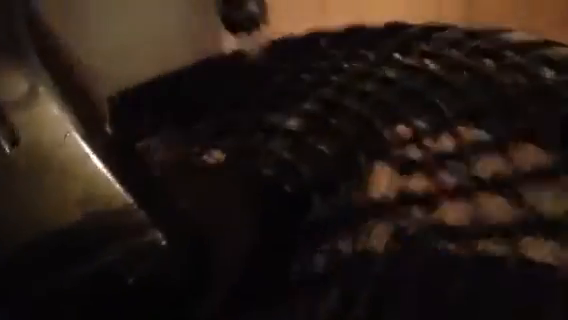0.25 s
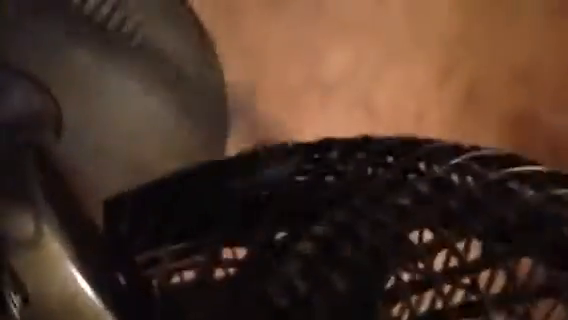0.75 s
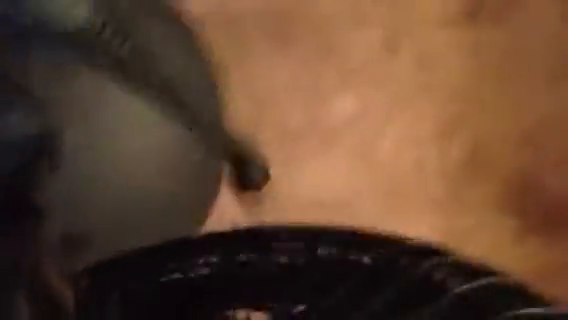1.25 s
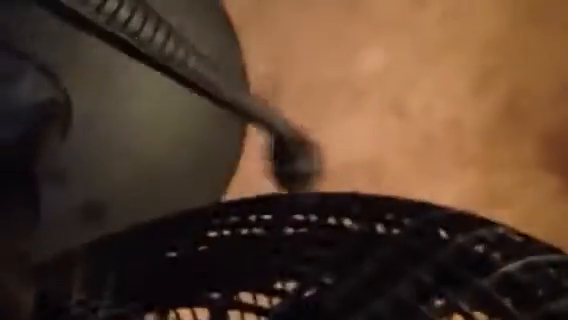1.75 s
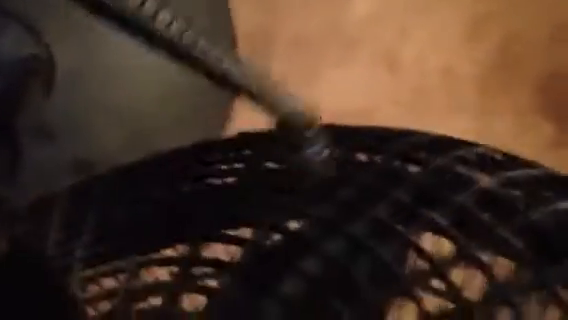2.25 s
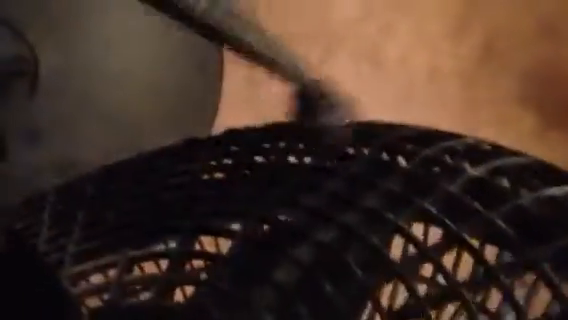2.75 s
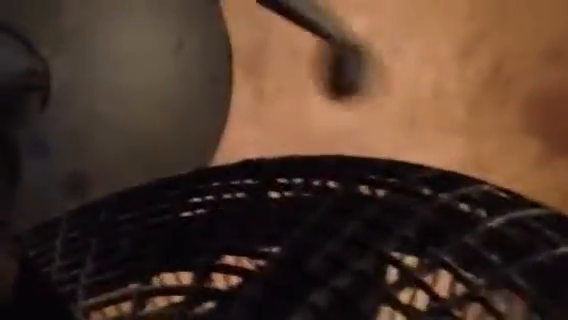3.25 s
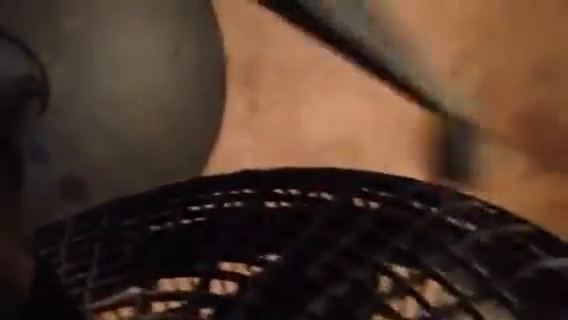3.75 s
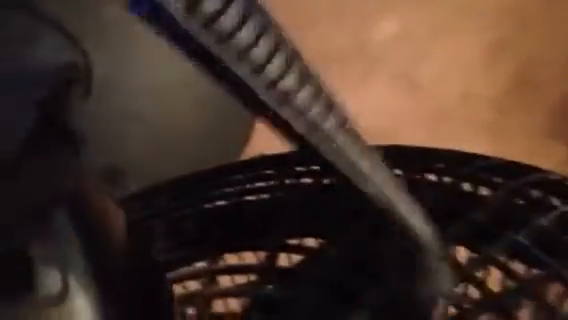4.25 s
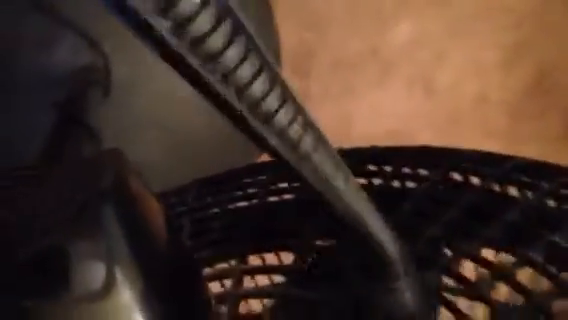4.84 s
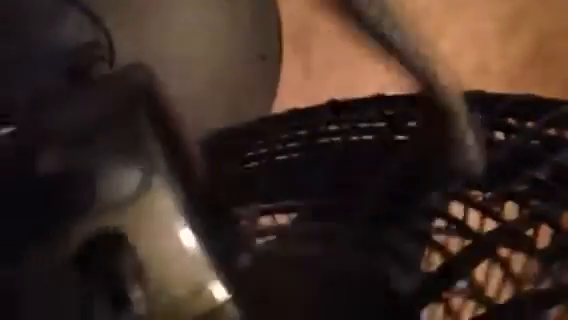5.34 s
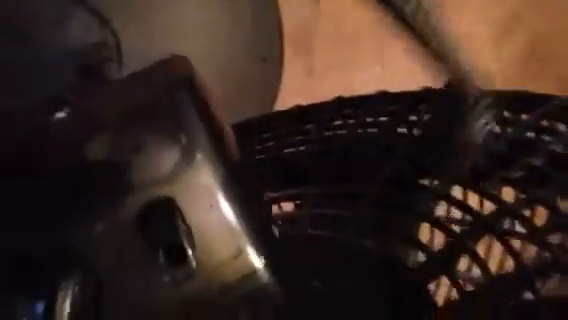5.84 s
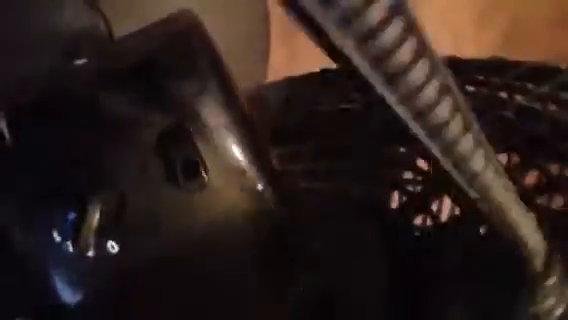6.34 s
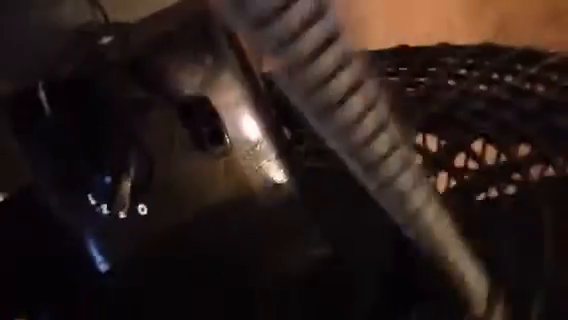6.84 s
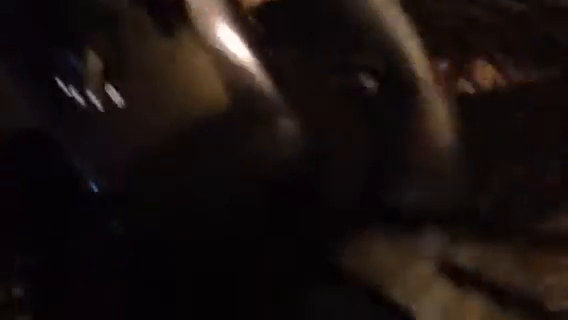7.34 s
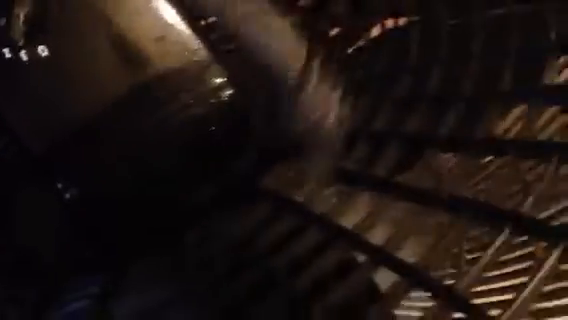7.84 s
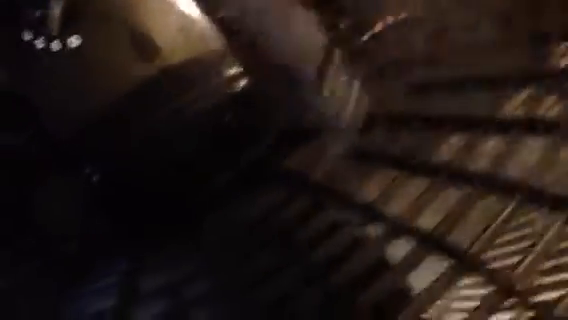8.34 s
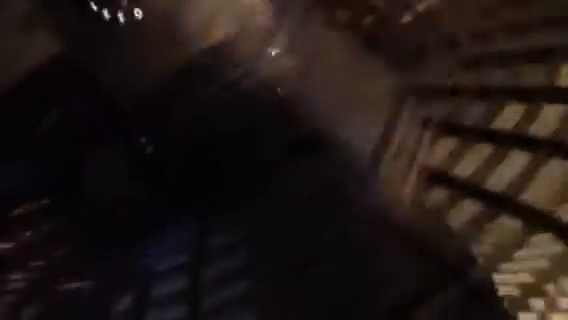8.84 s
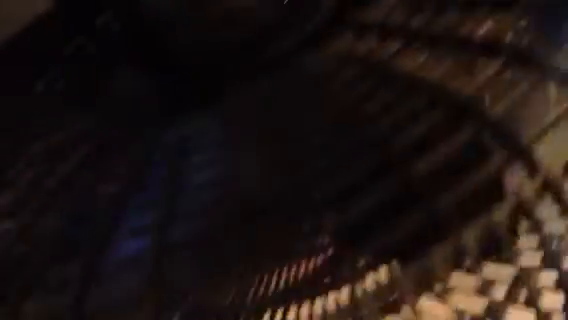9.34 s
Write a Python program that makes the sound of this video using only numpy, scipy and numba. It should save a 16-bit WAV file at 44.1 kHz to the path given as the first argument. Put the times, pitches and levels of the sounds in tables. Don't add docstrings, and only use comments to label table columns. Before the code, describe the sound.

A pressurised steam nozzle hisses from the very start to the end near 9.6 s, heard very close on a slightly grainy one-microphone phone indoors. The hiss is bright, wet and finely sputtering, with a hollow, wandering ring around 5 kHz. From 0 to 4 s it sweeps a fan's wire guard: the roar swells on wires and thins at openings, short whistles appear around 1.3-1.6, 2.2 and 3.1 s, and soft low gusts buffet the microphone. From about 4 s the jet strikes the blades, adding abrupt broad howls around 2-4 kHz, clustered at 4.5-5.3 s and strongest at 6.0-6.3 s. Small drops snap at 4.3, 6.4 (loudest) and 7.7 s. From 7.2 to 8.9 s sliding whistles and rougher, fuller bursts alternate, then the wavering hiss simply continues to the cut.

```python
import sys
import numpy as np
from scipy import signal
from scipy.fft import rfft, irfft, dct, next_fast_len
from scipy.io import wavfile
from scipy.ndimage import uniform_filter1d
from numba import njit

SR = 44100
rng = np.random.default_rng(int(sys.argv[2]) if len(sys.argv) > 2 else 0)


def convert_level_to_amplitude(level_db):
    exponent = np.asarray(level_db, float) / 20
    return 10 ** exponent


def dump(signal):
    limited = np.clip(np.atleast_2d(signal).T, -1, 1)
    pcm = np.round(limited * 32767).astype(np.int16)
    wavfile.write(sys.argv[1], SR, pcm)


N = 422037
TIME = np.arange(N) / SR
BODY_HZ, CHEST_HZ, ROAR_HZ, RING_HZ, FIZZ_HZ, AIR_HZ = 370, 810, 1800, 4250, 7000, 10700

# freq_hz, density_db (per Hz)
HISS = [(250, -27), (400, -11.5), (630, -9), (1000, -7.5), (1400, -5.5), (1750, -3), (2500, -2.5),
        (3700, -2.5), (5300, -0.5), (7800, -4), (12000, -5.5), (13500, -6.5), (15000, -6.5)]
# time_s, flow_db, aim_db (at phone), shade_db (steam cloud on the top), contact_db (guard)
SWEEP = [(0.0, -25.5, -4, 0.5, -1), (0.56, -22.5, -4.5, 2.5, -4), (1.13, -28.5, 1, 1.5, -0.7),
         (1.69, -20, -8, 1.5, -9.5), (2.25, -25, 3.4, 4.5, -2), (2.81, -25, -2, 3.5, -3.5),
         (3.38, -25.5, -1.3, 7.5, -3), (3.94, -24.2, -2, 7, -5), (4.5, -21.5, -2, 7.5, -5),
         (5.07, -23, -2.5, 7, -2), (5.63, -27, -0.3, 3, 0.5), (6.19, -23.5, -5, 4, 2),
         (6.76, -26, -2, 3, -1.55), (7.32, -23, -3.5, 5, -0.64), (7.88, -23, -5, 2.6, -2.5),
         (8.44, -23, -4.5, 4, -4.5), (9.01, -23.9, -2, 3.8, -3), (9.57, -24, -7.5, 3.6, -3.5)]


def unit(x):
    return x / np.sqrt(np.mean(x ** 2))


def curves(table):
    s, *columns = np.transpose(table)
    return [np.interp(TIME, s, c) for c in columns]


def walk(rate_hz):
    hold = int(SR / rate_hz)
    held = np.repeat(rng.standard_normal(N // hold + 1), hold)
    return unit(uniform_filter1d(uniform_filter1d(held, hold), hold)[:N])


def flutter(rate_hz):
    shake = walk(rate_hz)
    return unit(shake - uniform_filter1d(shake, int(4 * SR / rate_hz)))


def gate(t, length_s, edge_s):
    return np.clip(np.minimum(t, length_s - t) / edge_s, 0, 1)


def swings(table, eddy=None):
    rise_s, fall_s, size_spread = .025, .03, .6
    total_db = 0.68 * flutter(65)
    for s, hold_s, db, *size in table:
        a, b = int(max(s, 0) * SR), int((s + rise_s + max(hold_s, 0) + fall_s) * SR)
        t = TIME[a:b] - s
        reach = np.exp(-((size[0] - eddy) / size_spread) ** 2) if size else 1
        rise, fall = t / rise_s, 1 - (t - rise_s - hold_s) / fall_s
        total_db[a:b] += db * reach * np.clip(np.minimum(rise, fall), 0, 1)
    return total_db


def band(x, colour, lo_hz, hi_hz, skirt_oct):
    size = next_fast_len(N)
    octave = np.log2(np.arange(size // 2 + 1) * SR / size + 1)
    hz, db = np.transpose(colour)
    rise = np.clip((octave - np.log2(lo_hz)) / skirt_oct + .5, 0, 1)
    fall = np.clip((octave - np.log2(hi_hz)) / skirt_oct + .5, 0, 1)
    tilt = convert_level_to_amplitude(np.interp(octave, np.log2(hz), db))
    shape = np.sin(np.pi / 2 * rise) * np.cos(np.pi / 2 * fall) * tilt
    return irfft(rfft(x, size) * shape, size)[:N]


@njit
def svf(x, hz, share):
    y, b, l = np.empty(len(x)), 0., 0.
    for i in range(len(x)):
        g = np.tan(np.pi * hz[i] / SR)
        v = (b + g * (x[i] - l)) / (1 + g * (g + share))
        b, l, y[i] = 2 * v - b, l + 2 * g * v, share * v
    return y


def turbulence(spit, lo_hz, hi_hz, count, patchy_db, rate_hz, colour=HISS):
    edges_hz = np.geomspace(lo_hz, hi_hz, count + 1)
    total = np.zeros(N)
    for a_hz, b_hz in zip(edges_hz, edges_hz[1:]):
        eddies = band(spit * rng.standard_normal(N), colour, a_hz, b_hz, .4)
        total += convert_level_to_amplitude(patchy_db * walk(rate_hz)) * eddies
    return unit(total)


def sputter(surge_db, drop_db, drops_per_s):
    drops = (rng.random(N) < drops_per_s / SR) * convert_level_to_amplitude(drop_db * rng.exponential(size=N))
    flash = signal.lfilter([1], [1, -np.exp(-1 / (0.001 * SR))], drops)
    return convert_level_to_amplitude(surge_db * flutter(60)) * (1 + 0.36 * flash)


def buffet():
    # freq_hz, density_db (per Hz)
    rumble = [(12, -49), (20, -28), (48, -12.5), (150, -7), (173, -5.5), (307, -7.5), (400, -7), (520, -29),
              (880, -120)]
    # start_s, hold_s, gain_db
    arrivals = [(.05, .08, 3), (.3, .17, 4.5), (.65, .55, -1.5), (1.29, .28, 5.5), (1.7, .12, 1.5),
                (2.0, 1.08, -1), (3.15, .22, 6), (3.43, .25, 6), (3.72, .1, 2.5), (3.94, .08, 4.5),
                (4.12, .13, 3.5), (4.49, .27, 4), (4.88, .17, 4.5), (5.28, .45, 4), (5.5, .12, 2),
                (5.8, .1, 3), (6.43, .14, 4.5), (6.79, .08, 3.5), (7.0, .06, 2.5), (7.19, .3, 5),
                (8.4, .08, 6), (8.63, .25, 1.5), (9.05, .25, 4)]
    calm_db = -56.3
    gusts = turbulence(convert_level_to_amplitude(.6 * walk(9)), 18, BODY_HZ, count=4, patchy_db=.9, rate_hz=12, colour=rumble)
    return convert_level_to_amplitude(calm_db + swings(arrivals) + 1.04) * gusts


def ripple(x, ripple_db):
    size = 2048
    lines = signal.stft(x, SR, nperseg=size)[2]
    comb = uniform_filter1d(rng.standard_normal(lines.shape), size=3, axis=0)
    comb = uniform_filter1d(comb, size=2, axis=1)
    lines = lines * convert_level_to_amplitude(ripple_db * comb / comb.std() - 0.95)
    return signal.istft(lines, SR, nperseg=size)[1][:N]


def shift_bands(x):
    # start_s, length_s, change_db, centre_hz
    band_moves = [(.05, .22, 3, 4800), (.32, .22, 3, 4200), (1.16, .17, 3, 8500), (1.41, .08, 3, 6500),
                  (1.43, .09, 3, 4400), (1.55, .09, 4, 4500), (1.84, .14, 3, 9400), (2.71, .08, 3, 6800),
                  (2.99, .07, 3, 5750), (3.29, .11, 4, 9400), (3.5, .07, 4, 4400), (3.99, .33, 3.5, 6300),
                  (4.55, .09, 3, 8600), (4.68, .06, 4, 6300), (5.07, .08, 3, 6700), (5.15, .12, 3, 7700),
                  (5.42, .1, 4, 5200), (5.99, .13, 3.5, 6800), (6.11, .21, 3, 7900), (6.66, .12, 3.5, 5450),
                  (7.23, .14, 4, 7800), (7.41, .1, 3, 4300), (8.12, .2, 3, 1900), (8.29, .13, 3, 7500),
                  (8.89, .18, 3, 6600), (9.0, .22, 3.5, 4100), (9.1, .27, 3, 7900), (9.24, .14, 3, 4350),
                  (1.24, .07, -4, 5100), (1.43, .06, -3, 5300), (1.82, .12, -3.5, 5300), (2.63, .11, -4, 8000),
               (2.8, .15, -4, 8500), (2.84, .11, -4, 5900), (3.45, .2, -4, 7500), (3.56, .07, -4, 1300),
               (3.62, .08, -4, 5900), (4.74, .07, -4, 5300), (4.84, .15, -4, 5100), (4.92, .29, -3, 9400),
               (5.07, .05, -2.5, 3150), (5.32, .38, -3.5, 8000), (5.75, .3, -3, 8500),
               (6.07, .06, -4, 4900), (6.18, .14, -3, 3900), (6.31, .12, -3, 2400), (6.47, .12, -3, 2400),
               (6.38, .18, -3, 5600), (7.13, .1, -4, 8400), (7.34, .24, -4, 6300), (7.68, .3, -3, 3600),
               (8.08, .17, -4, 5800), (8.1, .2, -3, 3500), (8.71, .12, -3, 6000), (9.35, .21, -4, 6100),
               (8.48, .1, -3, 5300), (3.82, .1, -3, 2200)]
    width, edge_s = .3, .03
    out = x.copy()
    for s, length_s, db, hz in band_moves:
        a, b = int(s * SR), int((s + length_s) * SR)
        t = TIME[a:b] - s
        change = convert_level_to_amplitude(db * gate(t, length_s, edge_s)) - 1
        out[a:b] += change * svf(out[a:b], np.full(len(t), 1. * hz), width)
    return out


def howls(table, rush, edge_s, width):
    out = np.zeros(N)
    for s, length_s, db, *hz in table:
        a, b = int(s * SR), int((s + length_s) * SR)
        centre_hz = np.linspace(hz[0], hz[-1], b - a)
        tone = unit(svf(svf(rush[a:b], centre_hz, width), centre_hz, width))
        out[a:b] += convert_level_to_amplitude(db) * gate(TIME[a:b] - s, length_s, edge_s) * tone
    return out


def blades(spit):
    # start_s, length_s, level_db, centre_hz
    blade_hits = [(4.545, 0.033, -25, 1570), (4.707, 0.072, -27, 3840), (4.927, 0.073, -24.5, 1950),
                  (4.91, .09, -23.5, 3620), (5.08, 0.039, -23, 3000), (5.166, 0.12, -23, 3330),
                  (5.993, 0.035, -26.5, 1260), (6.03, .052, -18.5, 2600), (6.09, .05, -22, 2650),
                  (6.144, 0.15, -21, 2750), (6.15, .14, -27, 1500), (6.02, .055, -26, 3700),
                  (7.568, .07, -25.5, 1800), (7.672, 0.045, -26, 2840), (8.857, .04, -32.5, 1000),
                  (5.625, .05, -25.5, 3000), (5.7, .045, -28, 2800), (6.15, .15, -26, 3700),
                  (4.57, .06, -28, 2600), (5.25, .058, -26, 3500), (4.72, .085, -28, 2700),
                  (7.59, .04, -33, 900), (8.385, .05, -33.5, 750), (9.15, 0.044, -35.5, 700),
                  (4.72, 0.095, -30, 1800), (3.99, 0.037, -45.5, 200), (5.81, .05, -47, 205),
                  (6.79, .05, -50, 180)]
    # start_s, length_s, level_db, whistle_hz
    whistles = [(.35, .08, -27, 5370), (1.31, .06, -25, 4930), (1.45, .08, -27, 6300),
                (1.62, .09, -24.5, 5300), (2.23, .07, -22, 5350), (3.14, .06, -24, 4800),
                (4.08, .1, -23, 4900), (4.52, .07, -27.5, 5440), (5.03, 0.082, -29, 5750),
                (5.2, .1, -25.5, 6050), (5.38, 0.088, -30.5, 5600), (6.18, .25, -29.5, 5240),
                (6.42, .05, -26, 6500), (7.19, 0.099, -25.5, 5050), (7.99, 0.1, -25.5, 5650),
                (8.24, .11, -28, 4250), (8.7, .25, -28.5, 4930)]
    # start_s, length_s, level_db, from_hz, to_hz
    slides = [(1.31, .05, -27, 5900, 5700), (1.62, .09, -27.5, 5900, 5200), (3.53, .07, -28, 4950, 5050),
              (3.67, .1, -24.5, 5000, 6000), (5.17, .07, -25, 3400, 3700), (7.745, .05, -26, 4900, 4500),
              (7.8, .14, -25, 4700, 5300), (8.09, .13, -24, 5000, 4550), (8.37, .11, -26, 4100, 4500),
              (8.49, .04, -27, 6900, 6900), (8.55, .04, -26, 7000, 6500), (3.14, .1, -29, 4900, 5000),
              (1.93, .07, -29, 5500, 5300), (4.6, .13, -27, 5600, 5600), (5.52, .1, -31, 4600, 4800),
              (7.52, .15, -28, 5600, 5200), (8.43, .05, -29, 5400, 5400)]
    # start_s, peak_db
    ticks = [
        (4.275, -9.5),
        (6.394, -7),
        (7.656, -11),
    ]
    rush = spit * convert_level_to_amplitude(0.88 * walk(40)) * rng.standard_normal((2, N))
    out = howls(blade_hits, rush[0], edge_s=0.007, width=.48)
    out += howls(whistles, rush[1], edge_s=.02, width=.18)
    out += howls(slides, rush[1][::-1].copy(), edge_s=.02, width=.1)
    t = TIME[:100]
    for s, db in ticks:
        out[int(s * SR):][:len(t)] += convert_level_to_amplitude(db) * np.exp(-t / .0003) * np.sin(2 * np.pi * 5000 * t)
    return out


def wires(spit):
    # start_s, hold_s, gain_db, eddy_size (0-1)
    strikes = [(0.64, 0.047, 3, 0.8), (1.22, 0.058, 5, 0.6), (1.44, 0.02, 3, 0.3), (1.95, 0.02, 9, 0.7),
               (2.6, 0.07, 2.5, 0.8), (3.5, 0.07, 3.5, 0.7), (4.0, 0.02, 5.5, 0.9), (4.08, 0.073, 2.5, 0.0),
               (4.53, 0.02, 7.5, 0.5), (4.59, 0.0034, 4, 0.98), (4.7, 0.048, 5.7, 0.4),
               (4.91, 0.027, 6.5, 0.4), (4.96, 0.0046, 2.5, 0.1), (5.07, 0.0085, 7.5, 0.2),
               (5.11, 0.04, 3.4, 0.2), (5.15, 0.12, 7, 0.25), (5.59, 0.0, 5.5, 0.8), (6.02, 0.016, 6, 0.0),
               (6.14, 0.07, 4, 0.4), (6.48, 0.1, 4.5, 0.94), (6.78, 0.008, 5.5, 1.0), (6.99, 0.02, 4, 1.0),
               (7.56, 0.046, 5, 1), (7.75, 0.054, 4, 1), (7.9, 0.033, 6.5, 1.0), (8.37, 0.02, 8, 0.86),
               (8.64, 0.015, 5, 0.7), (8.84, 0.011, 7.5, 0.83), (9.12, 0.17, 3, 0.93), (.04, .01, 5, .8),
               (2.63, .01, 3, .8), (5.49, .015, 4, .6), (8.12, .02, 3.5, .7), (8.19, .02, 4, .7),
               (6.24, .03, 2, .6)]
    # start_s, hold_s, loss_db, eddy_size (0-1)
    openings = [(0.0, 0.0, -11.5, 0.8), (0.11, 0.07, -7.7, 0.98), (0.303, 0.07, -5, 1.0),
                (0.945, 0.06, -5, 0.9), (1.818, 0.13, -5.5, 1.0), (2.04, 0.02, -6, 0.7),
                (5.298, 0.13, -4.2, 0.2), (5.66, 0.02, -5, 1.0), (5.733, 0.1, -4, 0.3),
                (5.87, 0.06, -4, 0.7), (6.08, 0.044, -5.5, 1.0), (6.29, 0.15, -7, 0.3),
                (6.463, 0.22, -6, 0.5), (6.94, 0.043, -1.5, 0.8), (7.063, 0.07, -6, 0.4),
                (7.965, 0.07, -5, 0.5), (8.26, 0.06, -1.5, 0.5), (8.51, 0.02, -4, 0.4),
                (9.342, 0.073, -3, 0.6), (1.15, .04, -3.5, .8), (3.9, .06, -4, .6), (5.23, .04, -2, .8)]
    # time_s, wake_hz
    wake_path = [(4.5, 2850), (4.56, 1930), (4.63, 2850), (5.25, 3350), (5.95, 2700), (6.3, 2540),
                 (7.2, 3230), (7.6, 2340), (8.0, 2820)]
    flow_db, _, _, contact_db = curves(SWEEP)
    moves = strikes + openings
    push_db = flow_db + contact_db
    roar_db = push_db + swings(moves, eddy=0)
    chest_db = push_db - 8.5 + swings(moves, eddy=.5)
    body_db = push_db - 16 + swings(moves, eddy=1)

    broad = turbulence(spit, ROAR_HZ, RING_HZ, count=4, patchy_db=0.66, rate_hz=25)
    wake_hz = curves(wake_path)[0] * (1 + .09 * walk(12))
    wake = unit(svf(broad, wake_hz, .3))
    share = np.clip(.15 + .04 * (roar_db + 27.0), 0, .8)
    roar = unit(np.sqrt(1 - share) * unit(broad) + 0.55 * share * wake)
    chest = turbulence(spit, CHEST_HZ, ROAR_HZ, count=3, patchy_db=1.0, rate_hz=22)
    body = turbulence(spit, BODY_HZ, CHEST_HZ, count=2, patchy_db=1.0, rate_hz=19)
    return convert_level_to_amplitude(roar_db + 0.81) * roar + convert_level_to_amplitude(chest_db + 0.98) * chest + convert_level_to_amplitude(body_db + 1.07) * body


def jet(spit):
    # time_s, centre_hz
    tip_path = [(0.0, 4930), (.37, 5250), (.96, 5160), (1.44, 5400), (2.29, 5430), (2.93, 5130),
                (3.54, 5080), (3.75, 5470), (4.16, 5180), (4.3, 5600), (5.0, 4960), (5.44, 5380),
                (6.48, 5530), (7.01, 5420), (7.8, 5010), (8.43, 4680), (8.5, 5300), (9.57, 5380)]
    # start_s, hold_s, change_db
    flares = [(0.33, 0.064, 4.7), (0.65, 0.027, 2.5), (1.13, 0.12, 2.4), (1.3, 0.17, 3),
              (1.36, 0.0095, -2.5), (1.7, 0.02, -5.5), (1.81, 0.1, -1.5), (2.0, 0.04, -1.5),
              (2.22, 0.054, 5.5), (2.52, 0.063, -1.5), (3.13, 0.059, 5), (3.69, 0.053, 1), (4.06, 0.076, 4),
              (4.27, 0.006, -9.5), (4.41, 0.0027, -13), (4.57, 0.07, -2), (4.73, 0.16, -2),
              (4.93, 0.045, -4), (5.3, 0.17, -3), (5.93, 0.0075, -4.5), (6.24, 0.13, -2.5),
              (6.83, 0.043, 3.8), (7.09, 0.04, -5.5), (7.18, 0.1, 4), (7.44, 0.068, -3),
              (7.68, 0.013, -3.5), (8.18, 0.029, -2.5), (8.32, 0.034, -4), (8.59, 0.07, -1.5),
              (8.83, 0.039, -1.5)]
    # start_s, hold_s, change_db
    flicks = [(0.13, 0.054, -3.7), (0.94, 0.051, -5.5), (1.14, 0.04, -4.5), (1.32, 0.054, -3),
              (1.42, 0.044, 4), (1.52, 0.041, -5), (1.7, 0.031, -4), (1.86, 0.04, -3.6), (2.2, 0.014, -4),
              (2.36, 0.022, 1), (2.46, 0.027, 3.5), (2.86, 0.09, 3.6), (3.14, 0.0082, 2.5), (3.54, 0.0, 3),
              (3.83, 0.092, -3.5), (4.12, 0.078, 1.5), (4.62, 0.039, -2), (5.3, 0.13, -4.5),
              (5.45, 0.12, -2), (5.98, 0.17, 2.5), (6.4, 0.038, 4.5), (6.58, 0.07, 3.5), (6.89, 0.046, 4),
              (7.18, 0.0029, 5), (8.0, 0.07, 4.3), (8.23, 0.11, 2), (8.47, 0.077, 6), (8.58, 0.045, -3.5),
              (9.06, 0.056, -3.5), (9.22, 0.043, 4)]
    flow_db, aim_db, shade_db, _ = curves(SWEEP)
    ring_db = flow_db + swings(flares)
    fizz_db = flow_db + aim_db + swings(flicks)
    air_db = fizz_db - shade_db + 0.077 * (fizz_db - flow_db - aim_db) + 1.1 * flutter(50)

    broad = turbulence(spit, RING_HZ, FIZZ_HZ, count=4, patchy_db=1.95, rate_hz=28)
    wide = band(spit * rng.standard_normal(N), HISS, 3000, 8000, 0.41)
    tip_hz = (5300 + 1.7 * (curves(tip_path)[0] - 5250)) * (1 + .025 * walk(20))
    tip = unit(svf(svf(wide, tip_hz, .12), tip_hz, .13))
    share = np.clip(.42 + 0.071 * (ring_db + 20.5), .05, .9)
    ring = np.sqrt(1 - share) * broad + .9 * np.sqrt(share) * tip

    fizz = turbulence(spit, FIZZ_HZ, AIR_HZ, count=3, patchy_db=2.3, rate_hz=20)
    air = turbulence(spit, AIR_HZ, 16500, count=3, patchy_db=1.4, rate_hz=24)
    top = convert_level_to_amplitude(fizz_db + 0.22) * fizz + convert_level_to_amplitude(air_db + 0.5) * air
    return convert_level_to_amplitude(ring_db + 0.3) * ring + convert_level_to_amplitude(.6 * flutter(70)) * top


def scene():
    spit = sputter(surge_db=0.47, drop_db=2.0, drops_per_s=400)
    hiss = ripple(jet(spit) + wires(spit), ripple_db=2.0)
    mono = shift_bands(hiss + blades(spit)) + buffet()
    return np.array([mono, mono])


def phone(x, follow, scatter_db, drift_db):
    # freq_hz, rms_over_step_db
    coarse = [(100, 4), (700, 1), (1800, 2), (3400, -1), (5500, -1), (7000, -3), (10000, -4), (12400, -5.5),
              (13300, -8.5), (14500, -7)]
    hop, wide, grid, top = 1024, 4, 18, 710
    count = N // hop + 2
    padded = np.pad(x, (hop - grid, (count + 1) * hop - N))
    window = np.sin(np.pi * (np.arange(2 * hop) + .5) / (2 * hop))
    frames = np.array([padded[j * hop:(j + 2) * hop] for j in range(count)]) * window
    a, b, c, d = np.split(frames, 4, axis=1)
    lines = dct(np.hstack([-c[:, ::-1] - d, a - b[:, ::-1]]), type=4, norm="ortho")
    lines = lines.reshape(count, -1, wide)

    centre_hz = (np.arange(hop // wide) + .5) * wide * SR / 2 / hop
    power = np.mean(lines ** 2, axis=2)
    masked = uniform_filter1d(power, size=15, axis=1)
    level_db = 10 * np.log10(np.where(centre_hz < 700, power, masked) + 1e-12)
    over_db = np.interp(centre_hz, *np.transpose(coarse))
    drift = np.resize(walk(1.5)[::hop], count)[:, None]
    short_db = drift_db * drift + scatter_db * rng.standard_normal(level_db.shape)
    step_db = follow * level_db + (1 - follow) * level_db.mean(axis=0) - over_db + short_db
    step = convert_level_to_amplitude(step_db)[..., None]
    lines = np.sign(lines) * step * np.floor((abs(lines) / step) ** .75 + .4054) ** (4 / 3)

    lines = lines.reshape(count, hop) * (np.arange(hop) < top)
    u, v = np.split(dct(lines, type=4, norm="ortho"), 2, axis=1)
    frames = np.hstack([v, -v[:, ::-1], -u[:, ::-1], -u]) * window
    frames[1:, :hop] += frames[:-1, hop:]
    return frames[:, :hop].ravel()[hop - grid:][:N]


def band_limit(x):
    return signal.sosfilt(signal.butter(12, 15420, fs=SR, output="sos"), x)


def record(dry):
    # time_s, low_hz, high_hz, level_db
    slips = [(.715, 6300, 7600, -31), (.715, 11700, 13000, -36), (4.799, 4600, 5700, -23),
             (4.80, 9600, 11100, -28), (6.26, 7500, 9000, -26), (8.535, 8300, 10400, -23)]
    mid = phone(np.tanh(1.098 * dry[0]) / 1.099, follow=.85, scatter_db=1.2, drift_db=1.1)
    side = np.zeros(N)
    for s, lo_hz, hi_hz, db in slips:
        frame = np.cos(np.pi / 2 * np.clip((TIME - s) / 0.013, -1, 1)) ** 2
        noise = unit(band(rng.standard_normal(N), [(20, 0), (20000, 0)], lo_hz, hi_hz, .01))
        side += convert_level_to_amplitude(db) * frame * noise
    return band_limit(np.array([mid + side, mid - side]))


dry = scene()
out = record(dry)
dump(out)
```